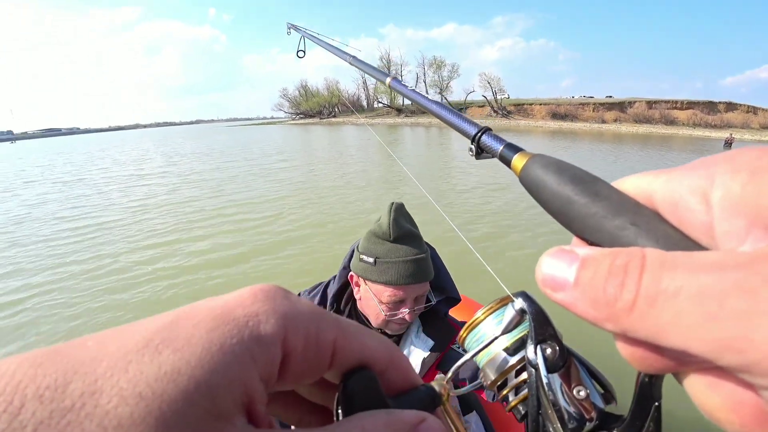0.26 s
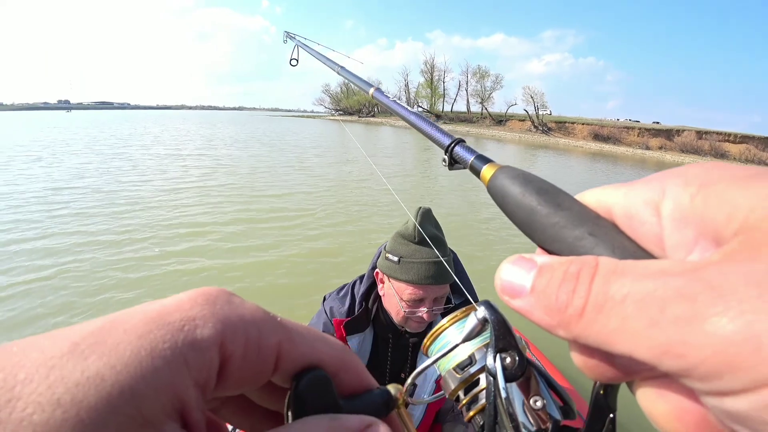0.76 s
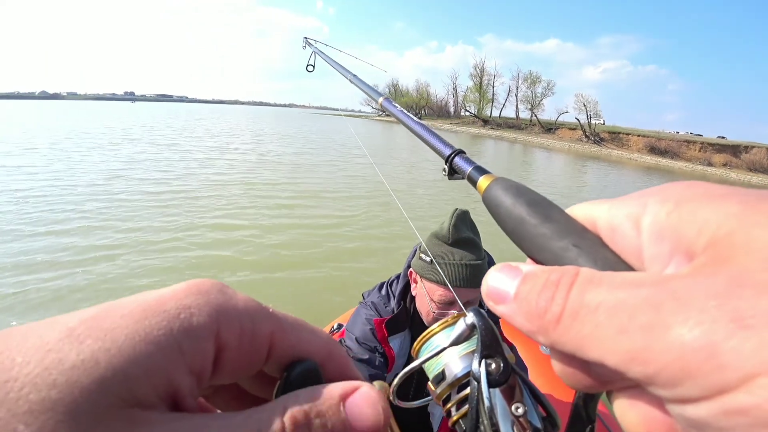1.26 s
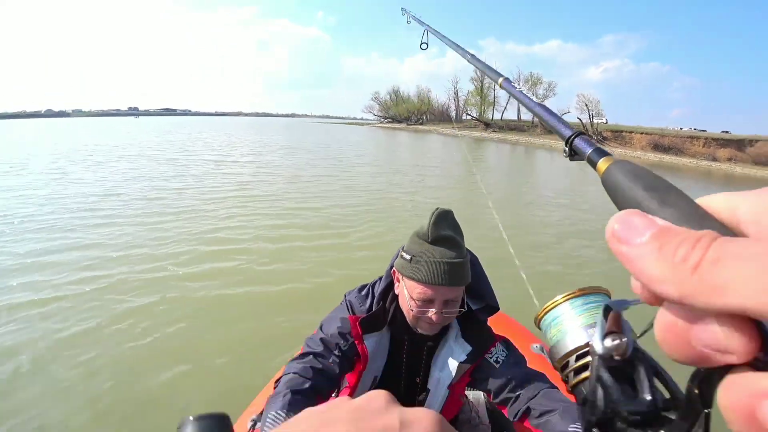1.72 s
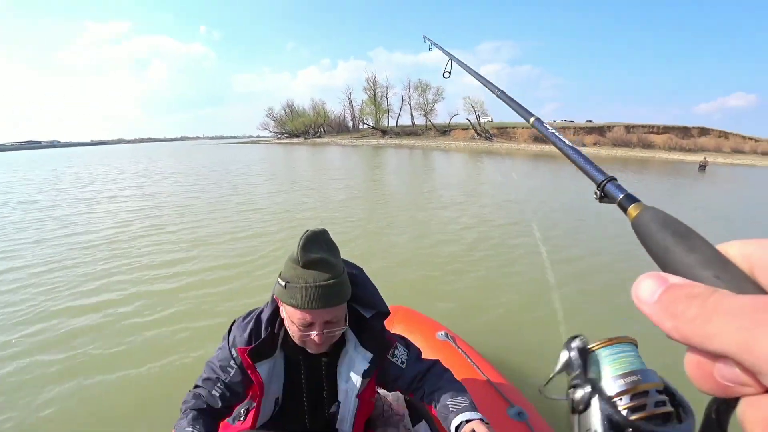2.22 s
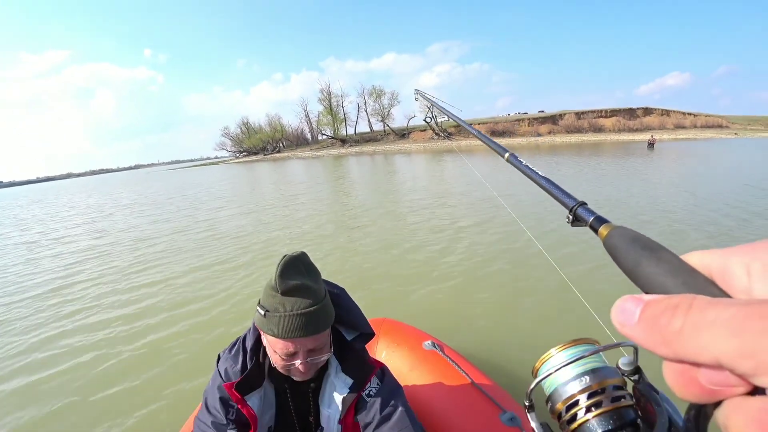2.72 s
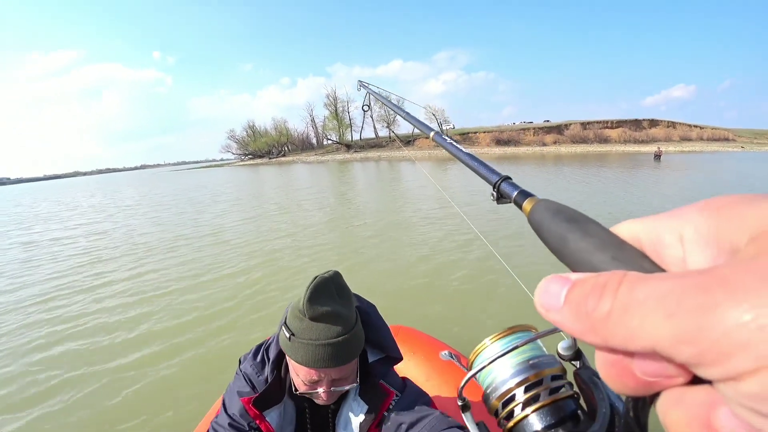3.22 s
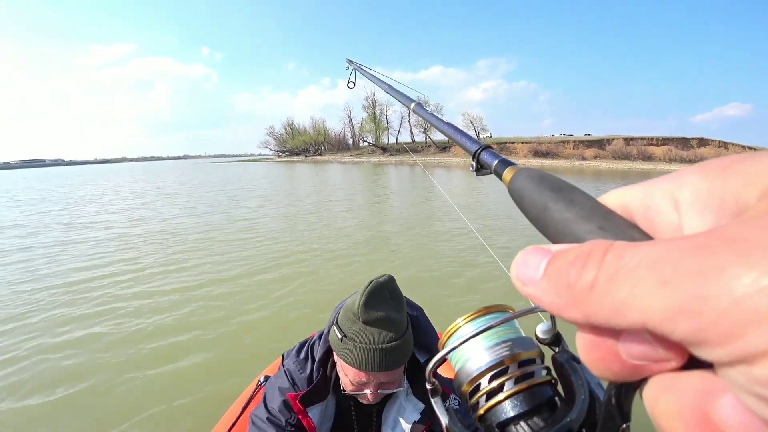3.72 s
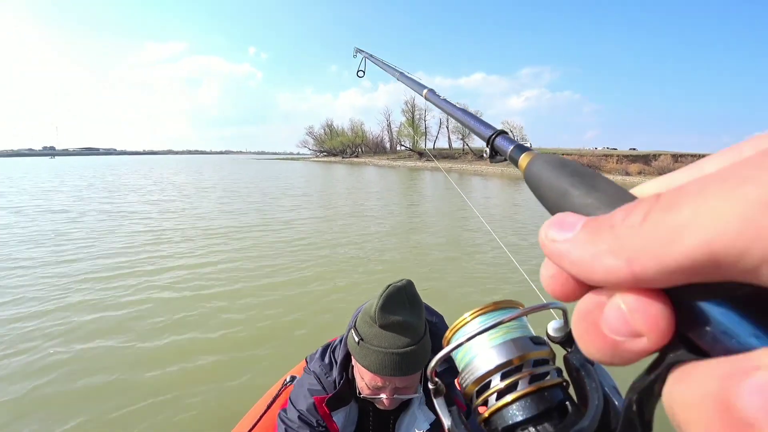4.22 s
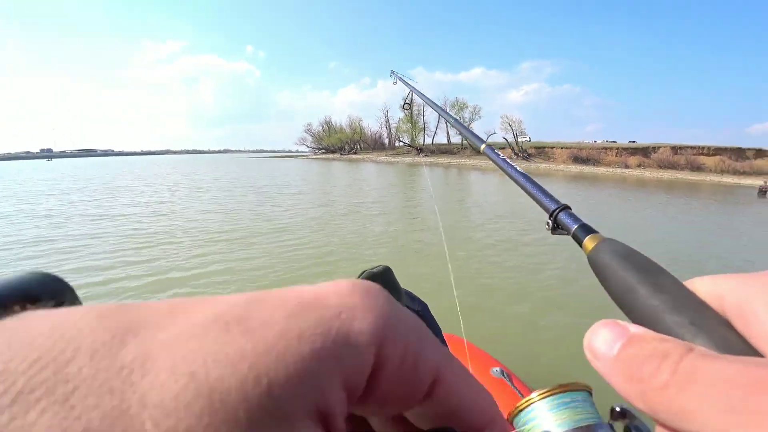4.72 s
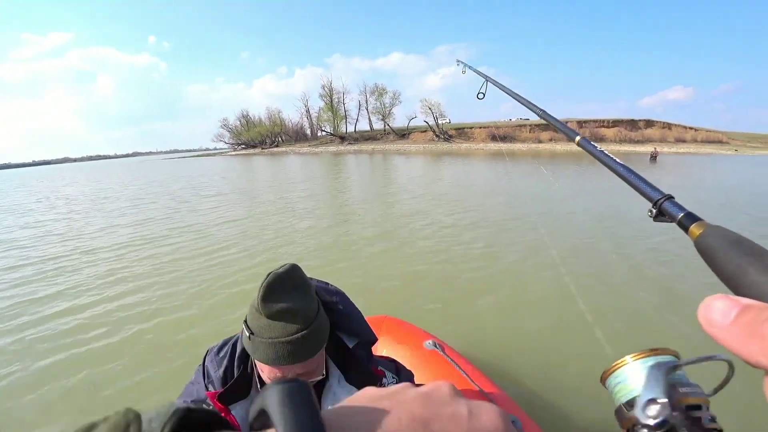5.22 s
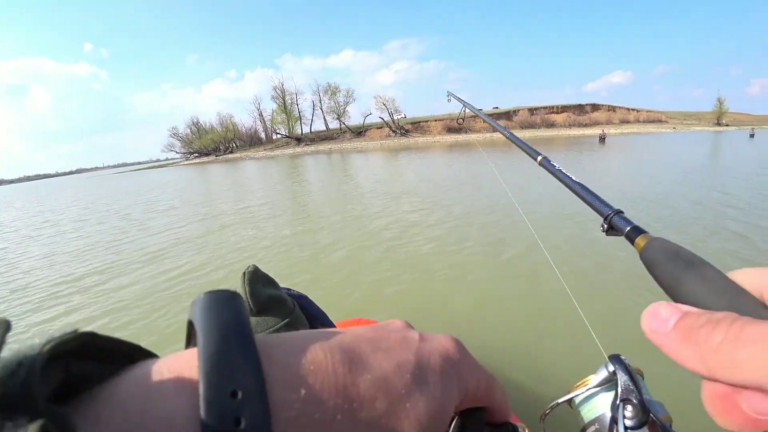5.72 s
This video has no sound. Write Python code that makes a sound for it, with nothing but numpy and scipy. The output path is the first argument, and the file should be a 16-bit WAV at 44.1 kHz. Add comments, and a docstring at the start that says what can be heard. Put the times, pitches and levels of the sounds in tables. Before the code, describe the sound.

Close-up spinning reel whirs twice between bright ticks, tackle clacks and muffled bumps, over gurgling water and a faint steady hiss outdoors.

```python
"""First a tick and a light clack of tackle, with a brush of sleeve and small waves lapping at the tubes.
An angler in an inflatable boat on calm water then cranks a spinning reel twice, close to a body-worn microphone.
The reel sings at its gear rate over a sliding hiss, and its pawl snaps in short bright rings.
Handling rocks the microphone housing in dull knocks, the sleeve is crackling grains of noise,
and the water is swarms of rising bubble tones over a noisy wash, with a faint steady hiss behind."""
import sys
import numpy as np
from scipy import signal
from scipy.fft import rfft, irfft, next_fast_len
from scipy.io import wavfile

SR = 44100
rng = np.random.default_rng(int(sys.argv[2]) if len(sys.argv) > 2 else 0)


def wav_out(sig):
    """Save sig, one row per channel (or a flat mono array), as 16-bit PCM at SR to the path in sys.argv[1]."""
    wavfile.write(sys.argv[1], SR, np.round(np.clip(np.atleast_2d(sig).T, -1, 1) * 32767).astype(np.int16))


N = 262968
TIME = np.arange(N) / SR
FFT_SIZE = next_fast_len(N, real=True)
FREQS = np.maximum(np.arange(FFT_SIZE // 2 + 1) * SR / FFT_SIZE, 1)


def from_db(db):
    """Decibels to gain."""
    return 10 ** (np.asarray(db) / 20)


def rms_one(x):
    """Scale to unit rms."""
    return x / np.sqrt(np.mean(x ** 2) + 1e-20)


def over_hz(table, axis=1):
    """One column of a table, read along log frequency."""
    table = np.array(table)
    return np.interp(np.log(FREQS), np.log(table[:, 0]), table[:, axis])


def drift(rate_hz):
    """Smooth random wander with spread 1, drawn at every 16th sample."""
    step = 16
    pole = np.exp(-2 * np.pi * rate_hz * step / SR)
    noise = rng.standard_normal(N // step + 502)
    # the first 500 values let the filter settle
    slow = signal.lfilter([1], [1, -2 * pole, pole * pole], noise)[500:]
    return np.interp(np.arange(N) / step, np.arange(len(slow)), rms_one(slow))


def add(out, s, sound):
    """Mix a short sound in at time s."""
    i = int(np.clip(round(s * SR), 0, N - 1))
    out[..., i:i + sound.shape[-1]] += sound[..., :N - i]


def panned(x, left_db):
    """Place a mono sound by its level difference, left minus right."""
    return x * from_db([[left_db / 2], [-left_db / 2]])


def butterworth(x, order, cut_hz, kind):
    """Filter with a smooth roll-off."""
    return signal.sosfilt(signal.butter(order, cut_hz, kind, fs=SR, output="sos"), x)


def ringing(x, hz, q):
    """Let one narrow resonance ring to a signal."""
    return signal.lfilter(*signal.iirpeak(hz, q, fs=SR), x)


def resonance(hz, width):
    """Response of one resonance, 1 on top."""
    return 1 / (1 + 1j * (FREQS ** 2 - hz ** 2) / (FREQS * width))


# the two microphone ports: (f/Hz, likeness 0-1, left minus right level/dB, left lead/rad)
PORTS = [(60, 0.5, 1, 0.1), (250, 0.9, -1.5, 0.56), (600, 0.63, -3, 0), (1500, 0.73, -4.5, 1),
         (2770, 0.68, -6, 0.52), (5170, 0.86, -4, 0.47), (11200, 0.89, -1, 0)]


def at_ports(pair, response):
    """Colour two unrelated signals and share them between the ports; rms 1."""
    alike = np.clip(over_hz(PORTS, axis=1), 0, 1)
    shared, own = rfft(pair, FFT_SIZE) * response
    sides = np.array([[1], [-1]])
    balance = from_db(sides * over_hz(PORTS, axis=2) / 2)
    lead = np.exp(.5j * sides * over_hz(PORTS, axis=3))
    mix = np.sqrt(1 + alike) * shared + sides * np.sqrt(1 - alike) * own
    return rms_one(irfft(balance * lead * mix, FFT_SIZE)[:, :N])


def grains(per_s, spread_db):
    """Two unrelated streams of random clicks of uneven size; rms 1."""
    sizes = from_db(spread_db * np.minimum(rng.exponential(1, (2, N)), 4))
    signs = rng.choice([-1, 1], (2, N))
    return rms_one(sizes * signs * (rng.random((2, N)) < per_s / SR))


def crackle(per_s, spread_db, cycles, count=16):
    """Two streams of tiny bursts, each ringing a few cycles at one of a set of pitches."""
    out, clicks = np.zeros((2, N)), grains(per_s, spread_db)
    dealt = rng.integers(0, count, (2, N))
    for k, hz in enumerate(np.geomspace(150, 10500, count)):
        # the tiny offset keeps the filter state from vanishing
        out += ringing(clicks * (dealt == k) + 1e-18, hz, max(cycles / 2.44, 1))
    return out


def bubble(hz, t60, rise, swell_cycles=1.0):
    """A bubble swells, rings and climbs in pitch as it nears the surface."""
    t = np.arange(int(max(t60, .002) * SR)) / SR
    envelope = from_db(-60 * t / t60) * (1 - np.exp(-t * hz / swell_cycles))
    return np.sin(2 * np.pi * hz * t * (1 + rise * t / t60)) * envelope / envelope.max()


def swarm(count, lowest_hz, highest_hz, cycles, rise, spread_db):
    """Two streams of bubbles of random size and strength."""
    out = np.zeros((2, N))
    for when, size, strength, port in rng.random((count, 4)):
        hz = lowest_hz * (highest_hz / lowest_hz) ** size
        gain = from_db(-spread_db * np.log(strength + 0.1)) * np.sqrt(hz)
        add(out[int(port * 2)], when * N / SR, gain * bubble(hz, cycles / hz, rise))
    return out


# colour of the still air and hiss: (f/Hz, relative level/dB)
AIR = [(20, -30), (60, -2.5), (120, -7), (250, 0.5), (450, -2), (900, 5), (1600, 2), (2700, 2),
       (4300, -0.5), (5500, -0.5), (8200, -1), (9500, -1), (11000, -4), (13000, -111)]


def air(level_db=-57):
    """Faint steady hiss over open water, as coloured noise."""
    return from_db(level_db) * at_ports(rng.standard_normal((2, N)), from_db(over_hz(AIR)))


WAVELET_RISE_S, TRICKLE_LAG_S = 0.088, 0.0035  # swell time constant; run-off behind the crest


def surge(crest, decay_s):
    """A wavelet swells quickly to its crest and drains away."""
    t = TIME - crest
    return np.exp(np.minimum(t / WAVELET_RISE_S, -t / decay_s))


# wavelets reaching the tubes, before the mix in water():
# (crest t/s, wash level/dB, trickle level/dB, decay t/s)
WAVELETS = [(0, -57, -49, 0.13), (.21, -55.5, -52, 0.27), (.46, -51.5, -49.5, .18),
            (.66, -56.5, -46.5, 0.16), (1.41, -62, -51, 0.3), (1.62, -56, -65, 0.068),
            (1.95, -66, -46.5, 0.072), (2.17, -53.5, -52, 0.42), (2.5, -52, -46.5, 0.068),
            (2.75, -57, -63, 0.21), (3.42, -62, -91, 0.12), (3.83, -79, -50.5, 0.29),
            (4.05, -90, -48.5, 0.17), (4.6, -67.5, -62, 0.33), (5.38, -53, -55, 0.23),
            (5.62, -70, -48, 0.28)]


def lapping(ripple_wash_db=-69, ripple_trickle_db=-63.5):
    """Strength of wash and run-off: wavelets on top of a ripple that never stops, summed in power."""
    wash, run_off = from_db(ripple_wash_db) ** 2, from_db(ripple_trickle_db) ** 2
    for crest, wash_db, trickle_db, decay_s in WAVELETS:
        wash = wash + (from_db(wash_db) * surge(crest, decay_s)) ** 2
        trickle = from_db(trickle_db) * surge(crest + TRICKLE_LAG_S, decay_s)
        run_off = run_off + trickle ** 2
    return np.sqrt(wash), np.sqrt(run_off)


# colour of the water: (f/Hz, relative level/dB)
WATER = [(30, -4), (60, 8), (120, 2), (220, -10), (400, -2), (700, 0.5), (1100, -2.5), (2500, -8.5),
         (4000, -5.5), (6000, -9), (8200, -7), (11000, -41), (13000, -50)]
# the clearest plops and gurgles: (t/s, relative peak level/dB, starting f/Hz, 60 dB decay t/s)
PLOPS = [(.185, -42, 600, 0.078), (0.211, -40, 992, .12), (.44, -36.5, 1580, .033),
         (.833, -34.5, 2380, .023), (1.381, -38.5, 535, 0.023), (1.745, -46.5, 521, .1),
         (1.78, -40.5, 773, 0.056), (1.865, -37, 648, 0.088), (2.256, -36.5, 447, 0.087),
         (3.006, -45.5, 203, 0.17), (3.233, -24.5, 3300, 0.0127), (3.238, -36, 480, 0.067),
         (3.324, -35, 1930, .016), (3.88, -44, 1070, 0.022), (4.065, -43.5, 1500, 0.08),
         (4.229, -48.5, 1000, 0.11), (5.364, -26.5, 2860, 0.014), (5.688, -34.5, 660, 0.031)]


def water(bubbles_db=5.0, wash_db=3.0, trickle_db=-2.0, surge_db=4.0,
          plop_rise=0.337, plop_db=-1.5, plop_left_db=-4.5):
    """Wavelets trap bubbles and fizz along the tubes; the run-off trickles back in small drops."""
    lap, run_off = lapping()
    colour = from_db(over_hz(WATER))
    bubbles = swarm(count=2400, lowest_hz=205.6, highest_hz=3690, cycles=18.0, rise=0.085, spread_db=3.5)
    gurgle = at_ports(bubbles, colour)
    drops = swarm(count=1500, lowest_hz=1090, highest_hz=6310, cycles=44, rise=0.15, spread_db=0.0)
    trickle = at_ports(drops, resonance(2140, 3600))
    fizz = crackle(6000, 2.5, cycles=6.6) * from_db(surge_db * drift(15))
    wash = at_ports(fizz, colour)
    plops = np.zeros(N)
    for s, db, hz, t60 in PLOPS:
        add(plops, s, from_db(db + plop_db) * bubble(hz, t60, plop_rise, swell_cycles=0.88))
    waves = lap * (from_db(bubbles_db) * gurgle + from_db(wash_db) * wash)
    return waves + run_off * from_db(trickle_db) * trickle + panned(plops, plop_left_db)


# brushes of sleeve and hand: (t/s, level/dB, bell-shaped spread t/s)
BRUSHES = [(.009, -43.5, .011), (.47, -55, 0.12), (0.632, -41.5, 0.004), (0.866, -48, 0.034),
           (3.111, -35.5, 0.0077), (3.147, -44, .016), (3.176, -44.5, 0.051), (4.034, -54.5, 0.047),
           (5.759, -47.5, 0.068)]
# colour of the cloth: (f/Hz, relative level/dB)
CLOTH = [(100, -38), (250, -5), (450, -7.5), (750, 5), (1300, -7), (1800, 1.5), (2400, 4), (3300, -10),
         (5000, -5.5), (8000, -8), (11000, -12), (13000, -59)]


def sleeve(per_s=2800, clump_db=2.5):
    """Stiff cloth crackles in clumps as it brushes past."""
    strokes = sum(from_db(db) * np.exp(-.5 * ((TIME - s) / half) ** 2) for s, db, half in BRUSHES)
    clumps = crackle(per_s, 1.64, cycles=8.3, count=30) * from_db(clump_db * drift(130))
    return strokes * at_ports(clumps, from_db(over_hz(CLOTH)))


# dry clacks of rod and tackle: (t/s, relative peak level/dB, centre f/Hz)
CLACKS = [(0.0114, -30, 2400), (0.2071, -27.5, 2730), (0.5558, -26, 1090), (0.64, -29.5, 3200),
          (1.2887, -36.5, 2100), (1.3303, -36, 2230), (1.3795, -32.5, 2520), (3.0802, -31, 1920),
          (3.1189, -26, 1950), (3.1342, -31.5, 1820), (3.1785, -35, 2150), (3.2252, -29, 2100),
          (3.2346, -23.5, 1770), (3.349, -32, 3580), (4.0504, -27.5, 6300), (4.1301, -34.5, 1670),
          (5.2181, -21, 2120), (5.468, -25.5, 1709)]


def clacks(level_db=0.5, decay_s=0.0021, rise_s=0.00039, tail_db=-19, tail_s=0.016,
           relative_width=0.32, snap_db=-19, left_db=-7.0):
    """Hard contacts on the well damped rod and grip: noise bursts through one broad resonance."""
    out, t = np.zeros(N), np.arange(1800) / SR
    for s, db, hz in CLACKS:
        decay = np.exp(-t / decay_s) + from_db(tail_db) * np.exp(-t / tail_s)
        contact = rng.standard_normal(len(t)) * decay * (1 - np.exp(-t / rise_s))
        clack = ringing(contact, hz, 1 / relative_width) + from_db(snap_db) * contact
        add(out, s, from_db(db + level_db) * clack / np.abs(clack).max())
    return panned(out, left_db)


# the reel's pawl ticks over in even runs:
# (first t/s, number of ticks, gap t/s, mean peak level/dB, lift of the ring below 6 kHz/dB)
TICK_RUNS = [(0.0117, 1, 0, -30.5, -15), (.3032, 1, 0, -30.5, -17), (0.694, 1, 0, -31.5, -17),
             (1.035, 1, 0, -31.5, -3), (1.328, 3, 0.057, -31, -15), (1.537, 2, .074, -32, -18),
             (2.565, 4, 0.061, -34, 1), (2.9643, 1, 0, -31.5, 0), (3.3033, 5, .139, -29, 3.5),
             (4.062, 1, 0, -28.5, 6.5), (4.3206, 4, .0505, -30, -3.5), (5.528, 3, 0.05, -34.5, -4),
             (5.7214, 2, 0.14, -31.5, -9)]


def pawl_ticks(uneven_db=1.0):
    """Each run spelled out tick by tick: (t/s, peak level/dB, lift of the low ring/dB)."""
    rows = []
    for s, count, gap, db, low_db in TICK_RUNS:
        for k in range(round(count)):
            rows.append((s + k * gap, db + rng.normal(0, uneven_db), low_db))
    return rows


# ring of a tick: (f/Hz, relative level/dB, 60 dB decay t/s)
TICK_MODES = [(4380, -1, 0.022), (4260, -1, 0.022), (8145, 4.5, 0.028), (8160, -1.5, 0.035),
              (8620, 2.5, 0.021), (9870, 1, 0.016)]


def ticks(crack_db=2.5, crack_s=0.0021, rise_s=0.0006, left_db=-2.5, path_spread=0.62):
    """A small metal part snaps over: a crack and a brief ring that reaches each port a little differently."""
    out, t = np.zeros((2, N)), np.arange(2200) / SR
    for s, db, low_db in pawl_ticks():
        ring = 0
        for hz, mode_db, t60 in TICK_MODES:
            start = rng.uniform(0, 2 * np.pi) + rng.normal(0, path_spread, (2, 1))
            ring_db = mode_db + low_db * (hz < 6000) + rng.normal(0, 3.2) - 60 * t / t60
            ring = ring + from_db(ring_db) * np.sin(2 * np.pi * hz * t + start)
        crack = signal.lfilter([1, 1], [1, -.2], rng.standard_normal(len(t))) * np.exp(-t / crack_s)
        tick = (ring + from_db(crack_db) * crack) * (1 - np.exp(-t / rise_s))
        add(out, s, from_db(db) * tick / np.abs(tick).max())
    return panned(out, left_db)


# dull knocks of handling: (t/s, relative level/dB, nominal f/Hz, spread of the rattle around it t/s)
KNOCKS = [(.487, -14.5, 440, 0.0072), (0.522, -28, 300, .016), (.556, -8.5, 437, .02),
          (0.638, -20.5, 333, 0.028), (1.101, -40, 144, .02), (1.647, -28.5, 273, 0.036),
          (2.154, -14, 395, 0.021), (2.1717, -14.5, 494, .018), (2.358, -15.5, 454, 0.0093),
          (2.415, -10, 524, 0.012), (2.5002, -17.5, 544, .008), (2.5095, -12, 418, .012),
          (2.724, -14, 363, 0.011), (2.736, -19, 290, 0.00713), (2.827, -25.5, 189, 0.02),
          (2.856, -28, 170, .01), (3.812, -44, 156, 0.011), (4.049, -36.5, 298, 0.011),
          (4.896, -8, 445, 0.031), (5.215, -19.5, 466, 0.0066)]
# lighter contacts around each knock: (offset in spreads, mean level against the knock/dB)
RATTLE = [(-1, -15), (-.5, -15), (.75, -13.5), (1.2, -29.5)]


def contacts(scatter=0.1474, uneven_db=-1.0, softer=0.84):
    """Every knock with the lighter, duller contacts around it: (t/s, relative level/dB, f/Hz)."""
    rows = []
    for s, db, hz, spread in KNOCKS:
        rows.append((s, db, hz))
        for offset, loss_db in RATTLE:
            early, strong, hard = rng.standard_normal(3)
            when = s + spread * (offset + scatter * early)
            rows.append((when, db + loss_db + uneven_db * strong, hz * softer * np.exp(scatter * hard)))
    return rows


def knocks(swell_cycles=0.44, fade_cycles=0.3, stiffening=0.91, lead_rad=2.395, level_db=-0.5,
           low_cut_hz=185, shudder_db=-20, shudder_hz=250, shudder_s=0.0056):
    """Each knock rocks the housing for a cycle or two, so the ports move almost against each other."""
    rocks, shudders, t = np.zeros((2, N)), np.zeros(N), np.arange(-900, 2700) / SR
    for s, db, hz in contacts():
        cycles = t * hz
        pressure = 2 / (np.exp(-cycles / swell_cycles) + np.exp(cycles / fade_cycles))
        # the contact is stiffest, and so highest, at full pressure
        phase = 2 * np.pi * np.cumsum(hz * (1 + stiffening * (pressure - .7))) / SR
        phase = phase - phase[t == 0]
        rock = pressure * np.cos(phase - np.array([[0], [lead_rad]]))
        add(rocks, s + t[0], from_db(db + level_db) * rock)
        add(shudders, s, from_db(db + shudder_db) * np.exp(-t[t >= 0] / shudder_s))
    # the mount shudders on briefly after each knock
    mount_response = resonance(shudder_hz, 233) ** 2 + 0.34 * resonance(90, 51)
    mount = shudders * at_ports(rng.standard_normal((2, N)), mount_response)
    return butterworth(rocks, 2, low_cut_hz, "high") + butterworth(mount, 2, [55, 900], "band")


def plateau(t, length, rise_s, fall_s):
    """Rise, hold and fall between 0 and 1."""
    return np.clip(np.minimum(t / rise_s, (length - t) / fall_s), 0, 1)


CRAWL_HZ = 558  # floor of the mean gear mesh rate
PUSHES_PER_S, PUSH_SWING = 4.9, .075  # pushes of the hand, and the share by which they swing the speed
# spells of cranking:
# (start t/s, length t/s, one push of the hand t/s, mean level/dB, fade-in t/s, fade-out t/s)
SPELLS = [(1.479, 1.29, 2.045, -47, .13, 0.23), (4.34, 1.38, 4.995, -47, 0.26, 0.15)]
# mean speed of the reel as its gear mesh rate, one list for each spell: (t/s, f/Hz)
SPEED = [
    [(1.45, 600), (1.66, 1050), (1.81, 1079), (1.94, 1770), (2.24, 1780), (2.35, 1474), (2.46, 1615),
     (2.54, 1326), (2.72, 783)],
    [(4.4, 600), (4.6, 1077), (4.76, 1217), (4.81, 1705), (4.95, 1956), (5.05, 1733), (5.27, 1843),
     (5.37, 1270), (5.7, 723)],
]


def cranking(unsteady=.025, unsteady_rate=14, push_db=.5):
    """Loudness and gear mesh rate: the reel spins up, surges with each push of the hand and runs down."""
    level, mesh_hz = np.zeros(N), np.zeros(N)
    for (start, length, push_at, db, fade_in, fade_out), speed in zip(SPELLS, SPEED):
        push = np.cos(2 * np.pi * PUSHES_PER_S * (TIME - push_at))
        level += from_db(db + push_db * push) * plateau(TIME - start, length, fade_in, fade_out)
        turning = np.interp(TIME, *np.transpose(speed)) * (1 + PUSH_SWING * push)
        in_spell = (TIME > start) & (TIME < start + length)
        mesh_hz = np.maximum(mesh_hz, turning * in_spell)
    return level, np.maximum(mesh_hz, CRAWL_HZ) * (1 + unsteady * drift(unsteady_rate))


# colour of the reel's sliding hiss: (f/Hz, relative level/dB)
WHIRR = [(150, -9), (300, -16), (620, -1), (950, -5), (1300, -5), (2300, -5.5), (3800, -5), (4800, 1.5),
         (5900, -6.5), (6800, -7), (9800, -7), (11000, -11.5), (13000, -123)]
# resonances of the reel body and spool: (f/Hz, width f/Hz, relative level/dB)
REEL_BODY = [(1695, 29, 4.5), (3050, 150, -2), (3566, 43, 6.5), (4125, 130, 3), (4240, 200, -13),
             (4866, 52, 7), (5215, 23, -22), (5630, 190, 1.5), (8100, 44, -58)]
# partials of the gear song: (multiple of the mesh rate, relative level/dB)
GEAR_ORDERS = [(.5, -9), (.72, -8), (1, 9.5), (1.5, -6.5), (1.8, -5), (2, -3), (2.5, -2), (3, -2.5),
               (3.5, -5.5), (4, -4)]


def reel(body_db=-2.0, jitter=.045, flutter_db=6.5, tooth_depth=0.13, grain_db=1.7,
         body_share=0.79, speed_power=0.65, shift_db=15.0):
    """Gear teeth sing at the mesh rate while sliding parts hiss through the reel body."""
    level, mesh_hz = cranking()
    phase = 2 * np.pi * np.cumsum(mesh_hz * (1 + jitter * drift(219.1))) / SR
    friction = (1 + tooth_depth * np.cos(phase)) * from_db(grain_db * drift(38))
    rub = at_ports(crackle(14000, 1.64, cycles=9.0) * friction, from_db(over_hz(WHIRR)))
    # the point of contact wanders, favouring one resonance, then another
    sliding = grains(6000, 4.7) * friction
    ring = np.zeros((2, N))
    for hz, width, db in REEL_BODY:
        favour = from_db(db + shift_db * np.tanh(drift(11)))
        ring += favour * ringing(sliding, hz, hz / width)
    ring = at_ports(ring, 1)
    # no two teeth strike alike, so each partial flutters in level and phase
    teeth = np.zeros((2, N))
    for order, db in GEAR_ORDERS:
        strength = from_db(db + flutter_db * np.sqrt(order) * np.tanh(drift(28.0)))
        teeth += strength * np.sin(order * phase + np.array([drift(36), drift(43)]))
    # a partial flares as it crosses a body resonance
    body = sum(from_db(db) * resonance(hz, width) for hz, width, db in REEL_BODY)
    sing = at_ports(teeth, resonance(2220, 1870) + body_share * body)
    sing = sing * (mesh_hz / 1800) ** speed_power  # faster is louder
    return level * (rub + from_db(body_db) * ring + sing)


def scene():
    """Everything is close and dry: nothing reflects on the open lake."""
    # the ticks and clacks carry no bass
    tackle = butterworth(ticks() + clacks(), 2, 220, "high")
    return air() + water() + sleeve() + tackle + knocks() + reel()


def record(dry):
    """The top is cut steeply above 11150 Hz."""
    return signal.sosfilt(signal.ellip(10, .3, 70, 11150, fs=SR, output="sos"), dry)


dry = scene()
out = record(dry)
wav_out(out)
```